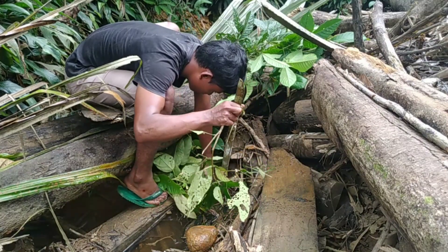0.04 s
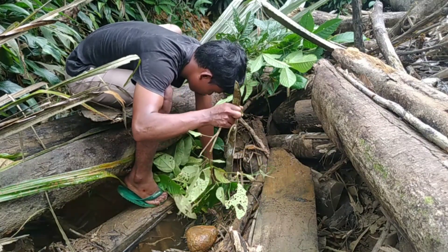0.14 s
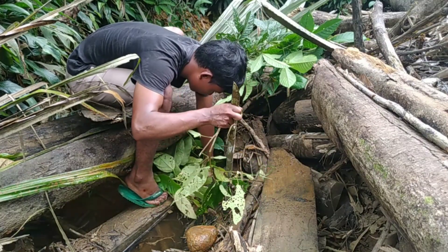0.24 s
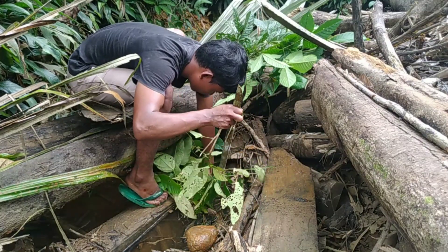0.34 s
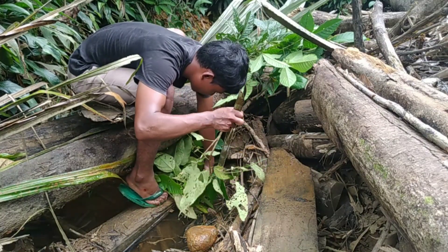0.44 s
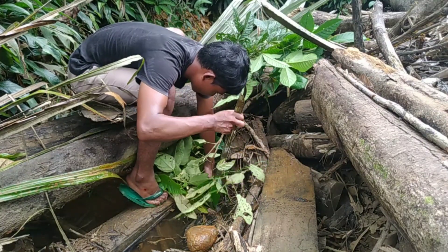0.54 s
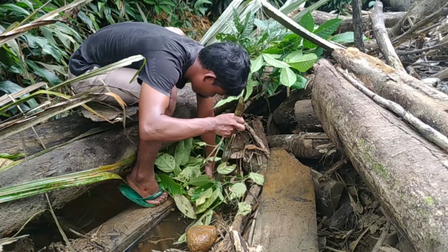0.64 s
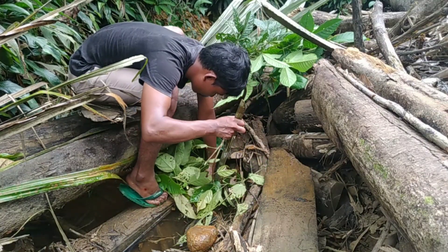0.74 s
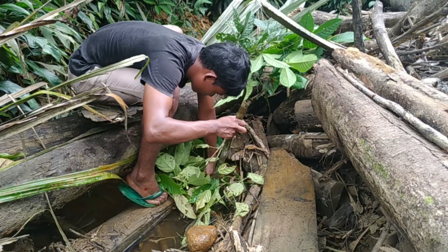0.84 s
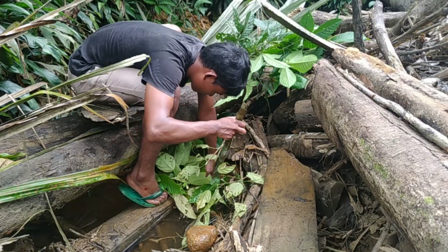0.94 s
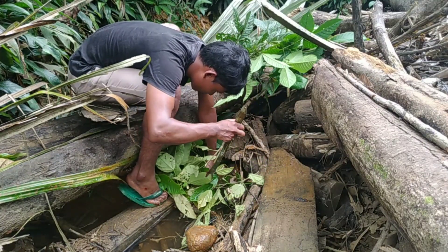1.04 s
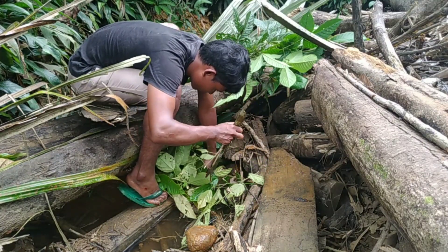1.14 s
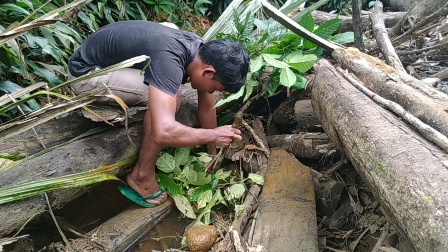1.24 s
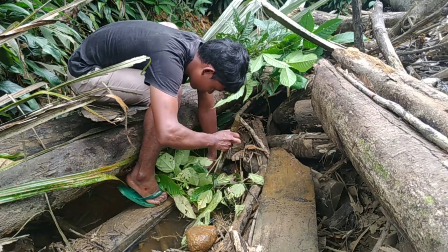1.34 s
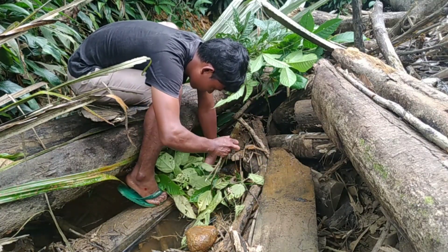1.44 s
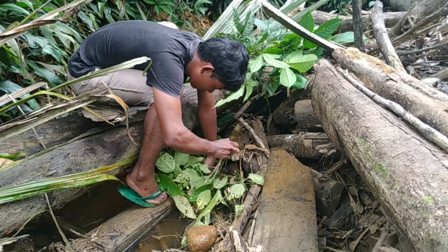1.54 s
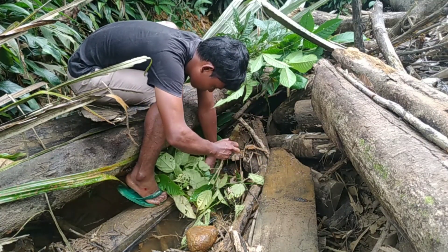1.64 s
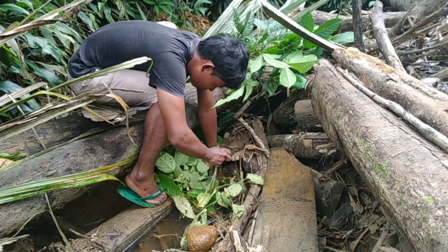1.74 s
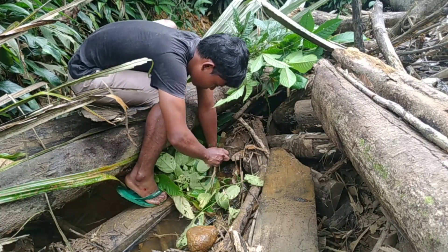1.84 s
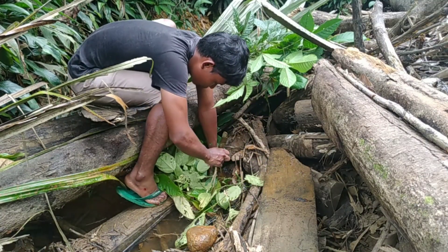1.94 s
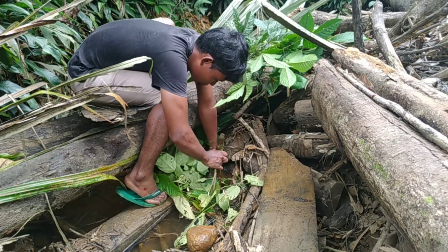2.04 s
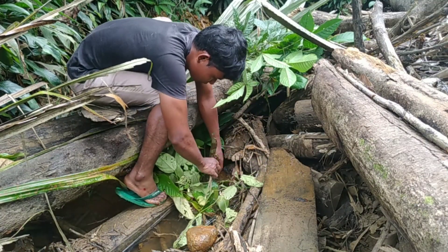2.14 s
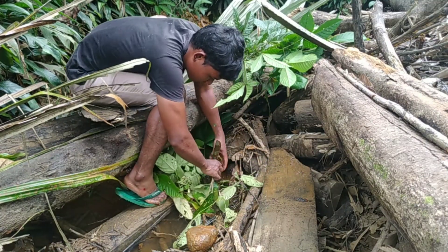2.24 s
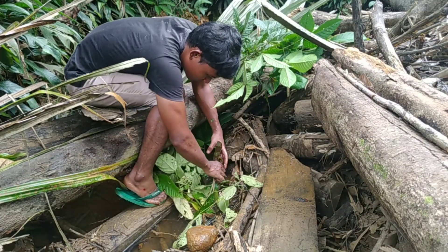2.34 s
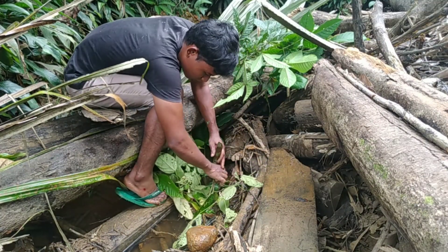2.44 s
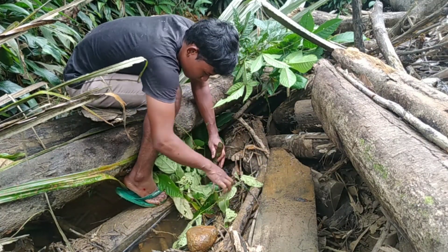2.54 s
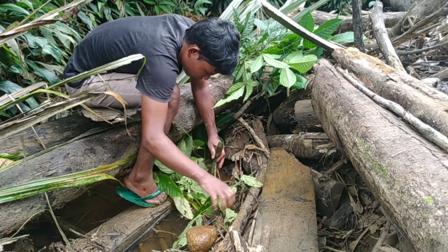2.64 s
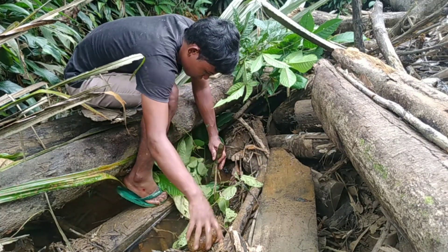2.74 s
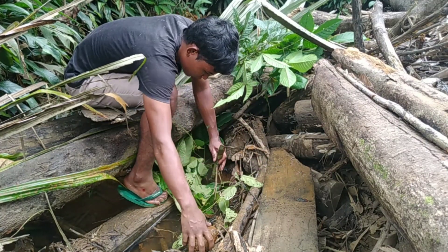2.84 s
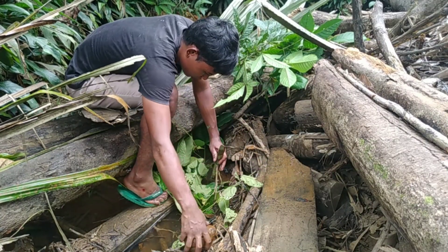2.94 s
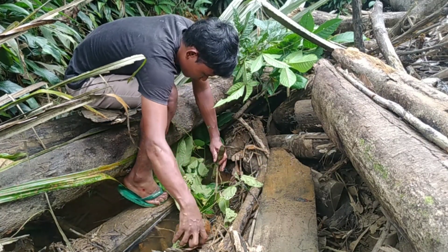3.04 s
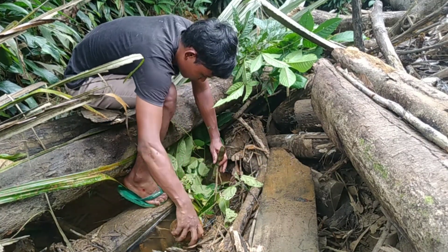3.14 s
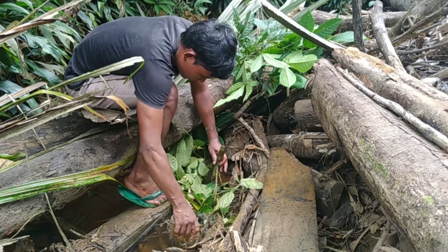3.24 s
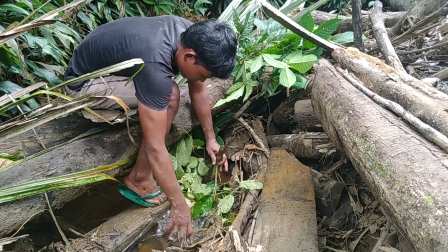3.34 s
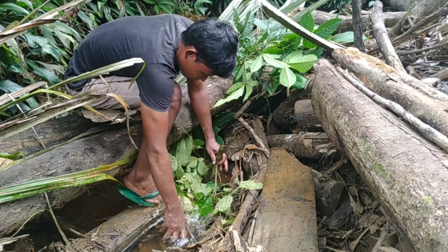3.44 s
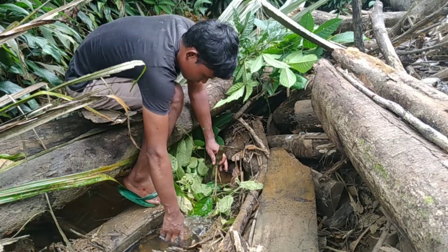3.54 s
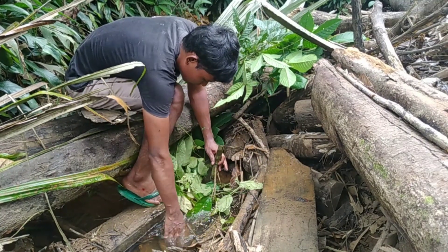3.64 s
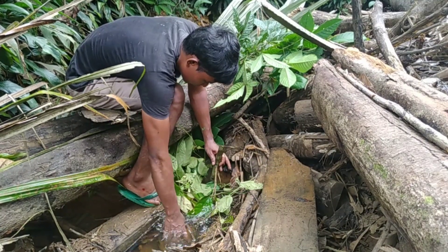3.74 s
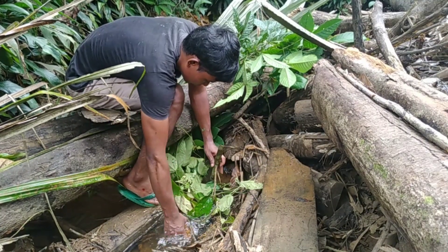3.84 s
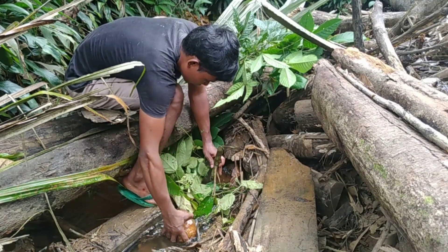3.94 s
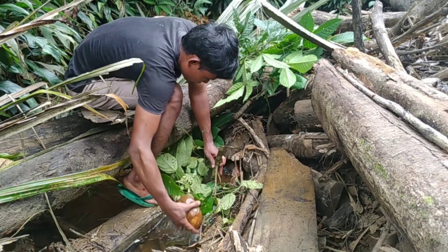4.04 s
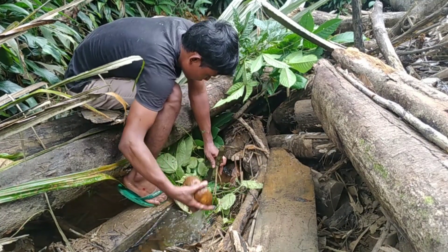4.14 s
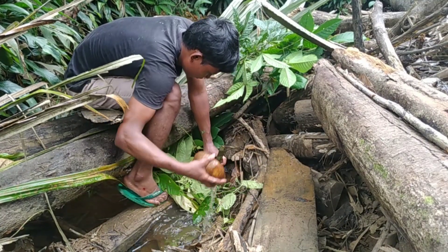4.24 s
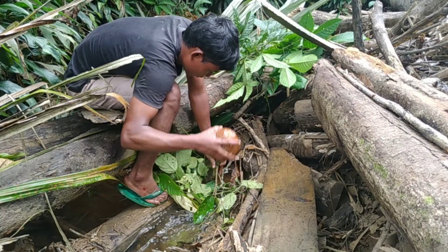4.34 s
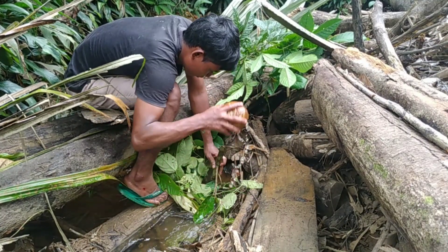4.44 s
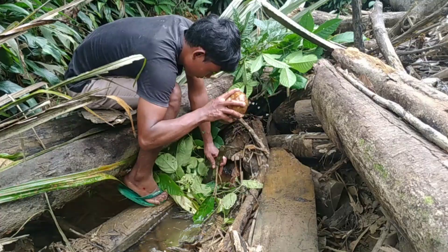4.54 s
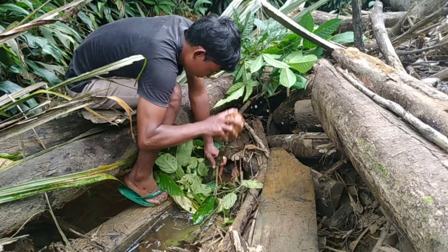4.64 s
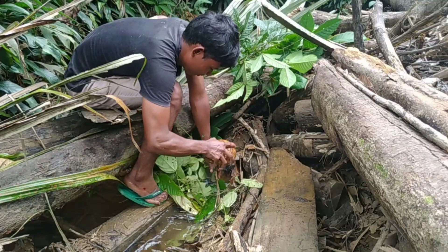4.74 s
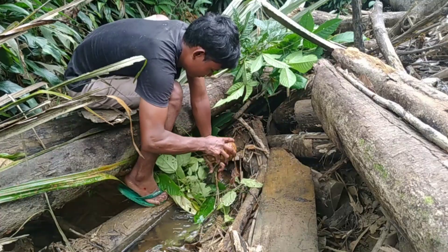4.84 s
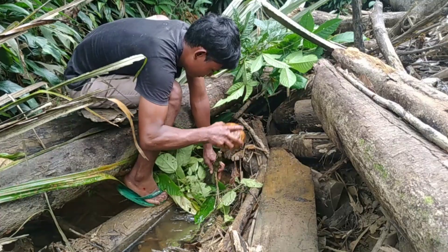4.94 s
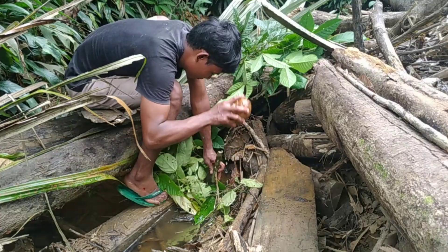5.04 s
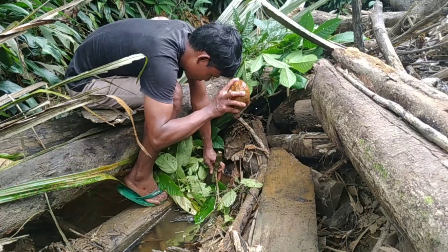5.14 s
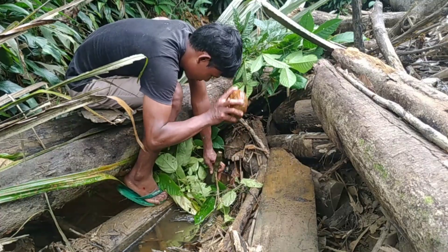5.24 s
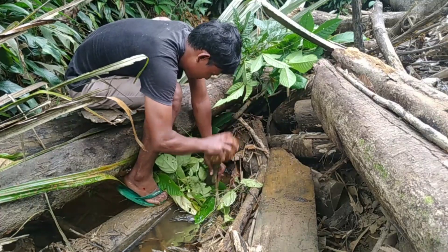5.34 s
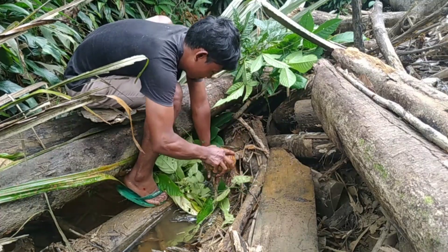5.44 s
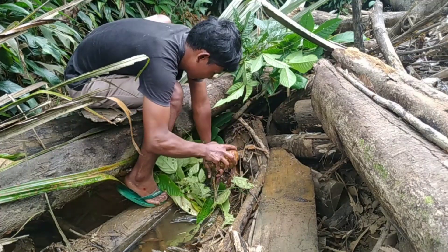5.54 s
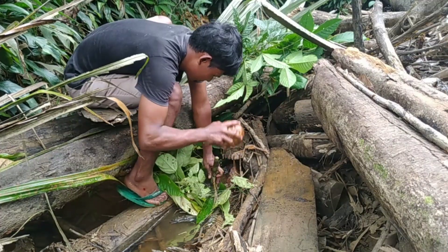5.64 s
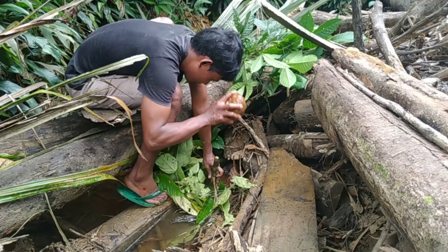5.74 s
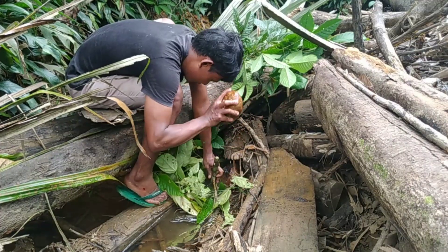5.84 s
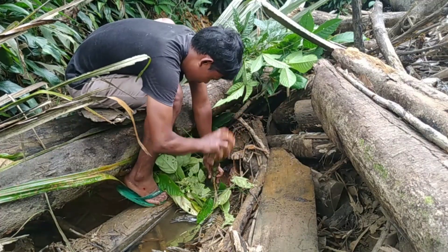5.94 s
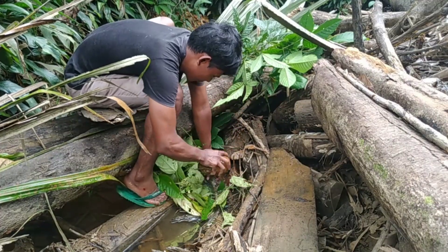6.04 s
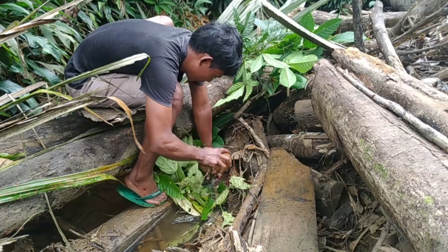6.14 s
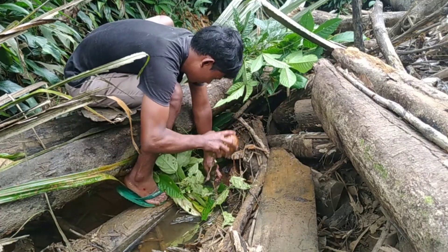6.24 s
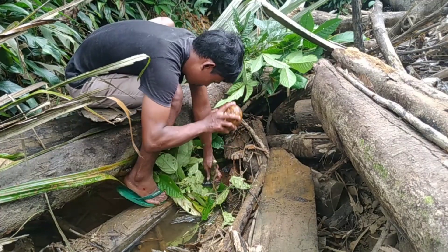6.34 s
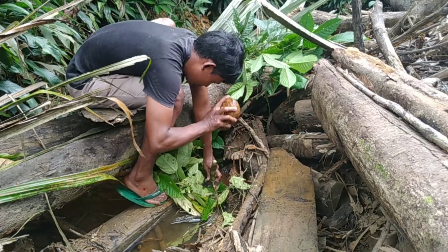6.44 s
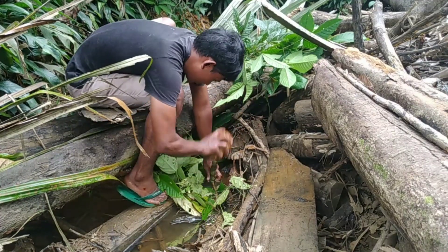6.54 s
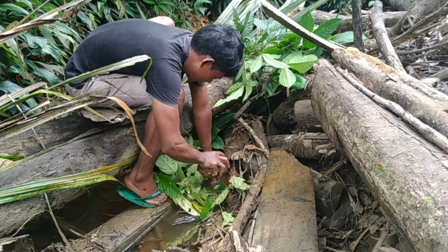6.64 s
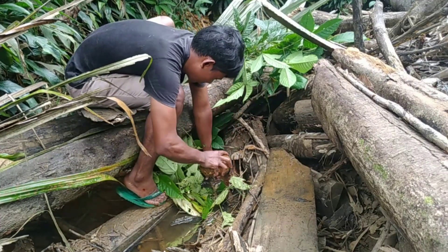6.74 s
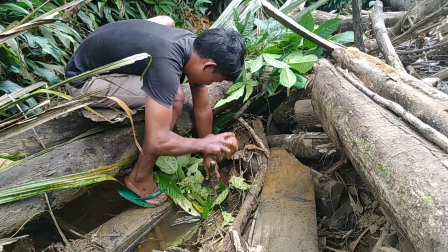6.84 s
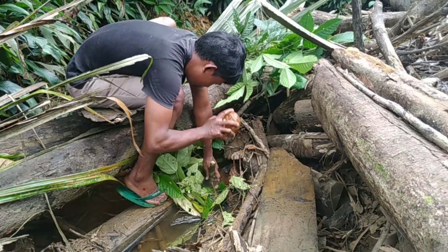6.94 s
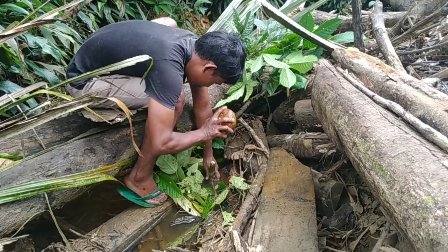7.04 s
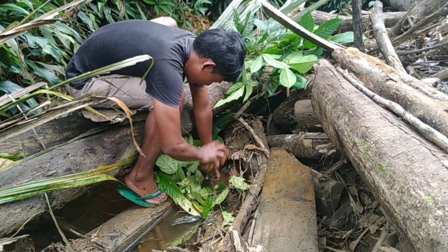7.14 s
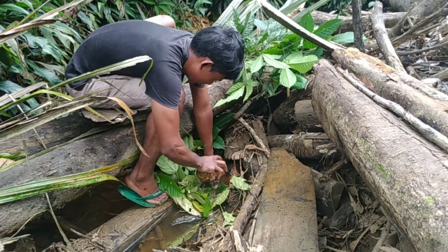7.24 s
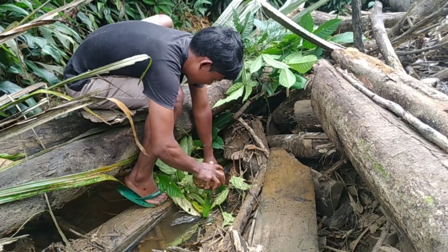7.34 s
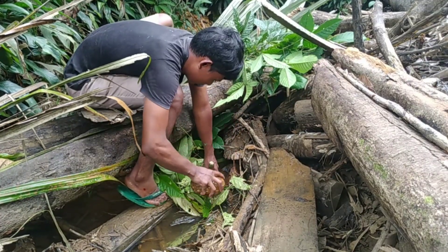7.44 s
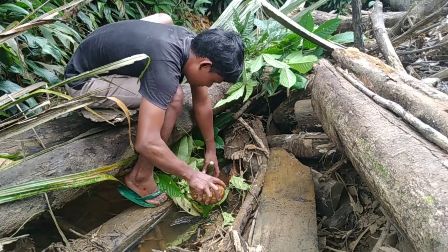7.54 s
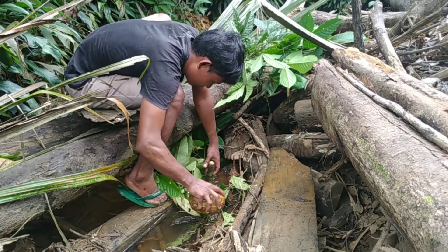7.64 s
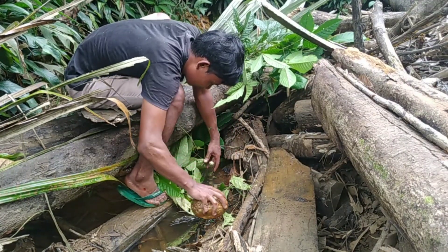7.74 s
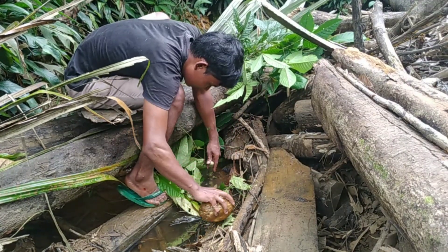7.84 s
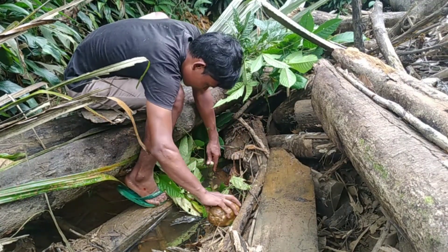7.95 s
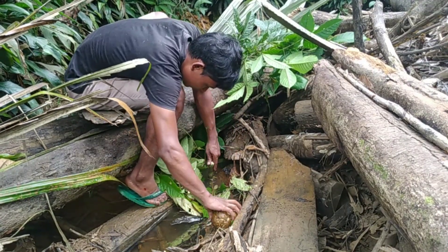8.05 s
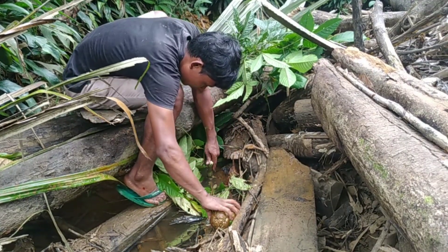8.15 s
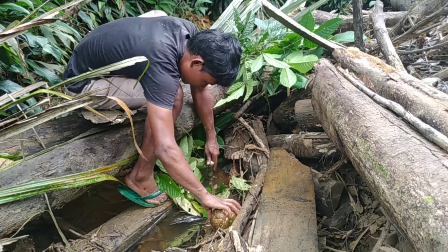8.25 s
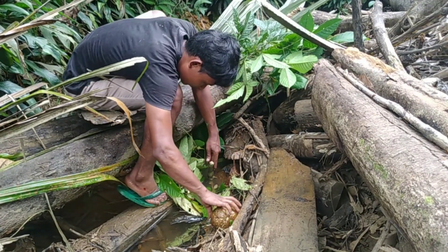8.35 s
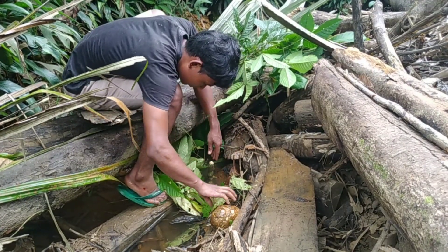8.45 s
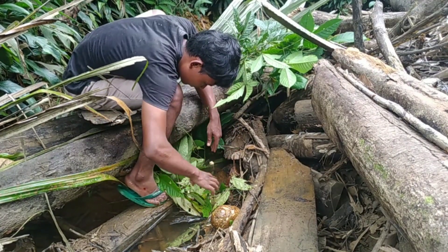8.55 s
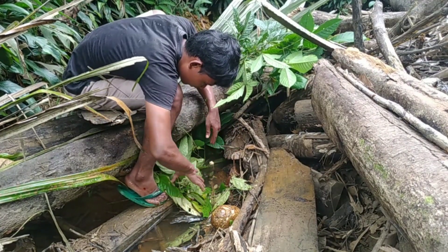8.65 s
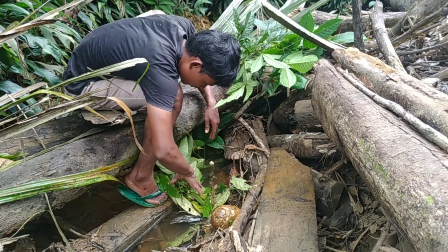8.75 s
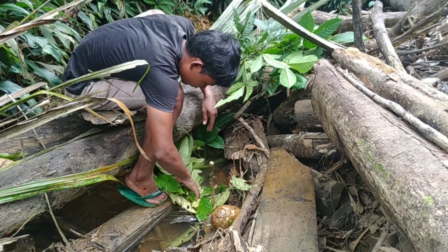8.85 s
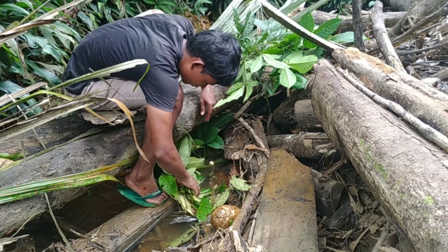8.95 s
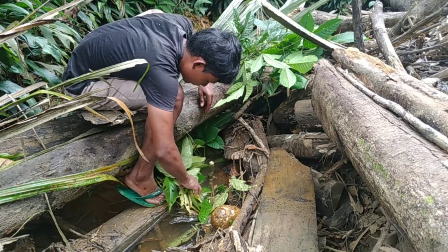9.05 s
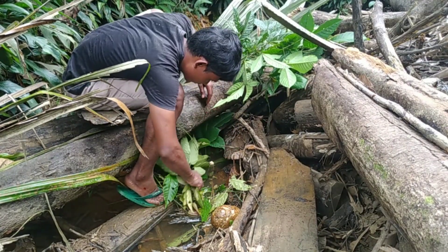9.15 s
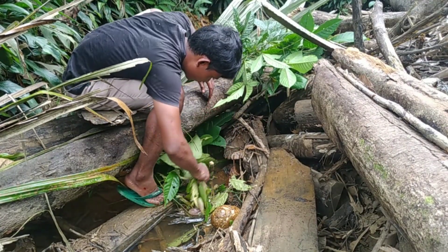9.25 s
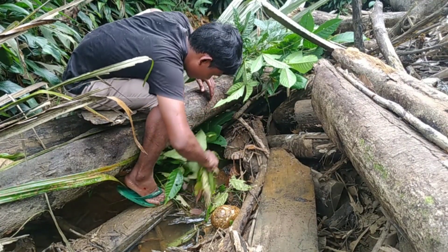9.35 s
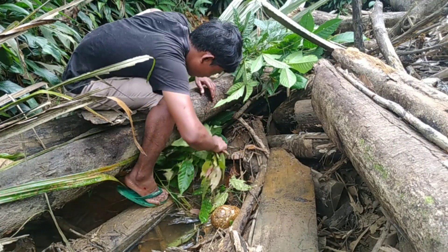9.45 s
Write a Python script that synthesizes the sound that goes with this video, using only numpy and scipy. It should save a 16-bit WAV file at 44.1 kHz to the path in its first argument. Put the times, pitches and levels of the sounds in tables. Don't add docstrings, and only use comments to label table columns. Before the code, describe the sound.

Leaves rustle and twigs snap, a husk splashes from shallow water, then five firm knocks drive a wooden stake amid hissing jungle cicadas.

```python
import sys
import numpy as np
from scipy import signal
from scipy.fft import rfft, irfft, next_fast_len
from scipy.io import wavfile
from scipy.ndimage import map_coordinates

SR = 44100
rng = np.random.default_rng(int(sys.argv[2]) if len(sys.argv) > 2 else 0)


def store_pcm(level_fs):
    pcm = np.round(np.clip(level_fs, -1, 1) * 32767).astype(np.int16)
    wavfile.write(sys.argv[1], SR, np.atleast_2d(pcm).T)


def volts_from_db(level):
    exponent = np.asarray(level, float) / 20
    return 10 ** exponent


N = 419391
PADDED = next_fast_len(N + SR // 4)
HZ = np.maximum(np.arange(PADDED // 2 + 1) * SR / PADDED, 1)
TIME = np.arange(N) / SR


def unit(x):
    return x / np.sqrt(np.mean(x ** 2) + 1e-20)


def in_time(rows):
    s, *columns = np.transpose(rows)
    return [np.interp(TIME, s, column) for column in columns]


def at_hz(points):
    hz, value = np.transpose(points)
    return np.interp(np.log(HZ), np.log(hz), value)


def filtered(x, gain):
    return irfft(rfft(x, PADDED) * gain, PADDED)[..., :N]


def colour(x, spectrum, ridges=1):
    inside = (HZ > spectrum[0][0]) & (HZ < spectrum[-1][0])
    return unit(filtered(x, volts_from_db(at_hz(spectrum)) * inside * ridges))


def drift(rate_hz):
    knots = rng.standard_normal(int(N / SR * 100) + 4)
    time = TIME[::16]
    return np.interp(TIME, time, map_coordinates(knots, [time * min(rate_hz, 99)], order=3))


def grains(per_s, spread_db):
    out, born = np.zeros(N), rng.random(N) < per_s / SR
    count = born.sum()
    size_db = spread_db * np.minimum(rng.exponential(1, count), 5)
    out[born] = volts_from_db(size_db) * rng.choice([-1, 1], count)
    return out


def add(out, s, sound):
    i = round(s * SR)
    out[i:i + len(sound)] += sound[:N - i]


# pitch_hz, likeness_share
FOREST_LIKENESS = [(40, 0.86), (130, 0.64), (500, 0.3), (1400, 0)]


def far_noise(spectrum, ridges=1):
    mid, side = rfft(rng.standard_normal((2, PADDED)))
    alike = np.clip(at_hz(FOREST_LIKENESS), -1, 1)
    pair = np.sqrt(1 + alike) * mid + np.sqrt(1 - alike) * side * np.array([[1], [-1]])
    return colour(irfft(pair, PADDED), spectrum, ridges)


# pitch_hz, level_db per Hz
AIR_SPECTRUM = [(59, -18), (100, -3), (176, -9), (1350, -20), (2870, -19.5), (3130, -15.5), (3470, -19.5),
                (4260, -18), (6000, -13), (7800, -35), (13200, -120)]


def forest_air():
    return volts_from_db(-53.5 + 2.5 + 0.5 * drift(3.94)) * far_noise(AIR_SPECTRUM)


# pitch_hz, level_db per Hz
BREEZE_SPECTRUM = [(12, -12), (27, -1), (60, -3.5), (110, -15.5), (220, -46)]
# start_s, level_db
GUST_LEVELS = [(0.0, -51), (0.69, -40.5), (1.32, -49), (2.27, -45), (2.81, -50), (4.74, -54), (5.24, -53.5),
               (6.44, -52), (6.73, -43), (7.07, -52), (7.47, -46.5), (8.92, -54), (9.4, -39), (9.51, -39)]


def breeze():
    return volts_from_db(in_time(GUST_LEVELS)[0] + 3 + 1.4 * drift(9.9)) * far_noise(BREEZE_SPECTRUM)


# pitch_hz, level_db per Hz
CHOIR_SPECTRUM = [(8000, -22.5), (8800, -2), (9700, 2.5), (10500, -1.5), (11300, -13), (12400, -6),
                  (13200, -16), (15250, -18.5), (15500, -45)]
# pitch_hz, level_db per Hz
LOW_CICADA_SPECTRUM = [(5000, -30), (5800, -14.5), (6400, -2.5), (7200, 1), (7900, -2.5), (8600, -11.5)]
# pitch_hz, level_db over the choir
LONE_SINGERS = [(6565, 3), (6794, 2), (7201, 5), (7250, 2), (7463, 6), (7644, 6), (7827, 5), (8035, 5),
                (8911, 5), (9125, 2), (9254, 5), (9415, 4), (9470, 4), (9631, 3), (9731, 4), (9895, 2),
                (10132, 6), (10260, 4)]
# pitch_hz, level_db
CHOIR_LEFT_TOP = [(9800, 0), (10800, -16), (11700, -20), (12300, -4), (13100, -16), (15000, -8)]
# start_s, end_s, level_db
LOW_CICADA_LULL = (1.0, 1.5, -3.5)


def cicadas():
    choir_db, low_db, singer_width_hz, tymbal_hz = -40.5, -45.5, 14, 181
    power = 1
    for hz, over_db in LONE_SINGERS:
        power = power + volts_from_db(2 * over_db) / (1 + (2 * (HZ - hz) / singer_width_hz) ** 4)
    ridges = np.sqrt(power)
    choir = far_noise(CHOIR_SPECTRUM, ridges) * volts_from_db(0.56 * drift(90))
    left = filtered(choir[0], volts_from_db(at_hz(CHOIR_LEFT_TOP)))
    choir = volts_from_db(choir_db + 3 + 0.54 * drift(5.7)) * np.array([left, choir[1]])
    tymbal = 1 + 0.078 * np.cos(2 * np.pi * np.cumsum(tymbal_hz + 1.6 * drift(2.2)) / SR)
    start, end, lull_db = LOW_CICADA_LULL
    falter_db = np.interp(TIME, [start - .2, start, end, end + 0.31], [0, lull_db, lull_db, 0])
    low_gain = volts_from_db(low_db + falter_db + 2.5 + 1.0 * drift(5))
    return choir + low_gain * far_noise(LOW_CICADA_SPECTRUM, ridges) * tymbal


# start_s, level_db
CRICKET_LEVELS = [(0, -56), (0.7, -65), (2.8, -65), (3.5, -63), (4.85, -58.5), (5.3, -66.5), (7.6, -60.5),
                  (8.8, -66), (9.51, -58)]


def cricket():
    hum = far_noise([(2930, -22), (3000, -14), (3050, 4), (3120, -1), (3200, 0), (3290, -14)])
    gain = volts_from_db(in_time(CRICKET_LEVELS)[0] + 2 + 3.0 * drift(6.0))
    return gain * hum * volts_from_db(np.array([[2.5], [-2.5]]))


# start_s, end_s, pitch_hz, level_db
FLY_HUM = (6.9, 9.1, 478, -65)


def fly():
    start, end, hz, level_db = FLY_HUM
    hover = np.interp(TIME, [start, start + 0.5, end - .2, end], [0, 1, 1, 0])
    gain = volts_from_db(level_db + 2.8 * drift(12)) * hover
    return gain * np.sin(2 * np.pi * np.cumsum(hz + 11.1 * drift(25)) / SR)


# start_s, length_s, pitch_hz, glide_hz_per_s, level_db
KATYDID_NOTES = [(0, 1.43, 12150, 52, -47), (1.37, 1.38, 12212, 112, -47), (0, 2.1, 12290, 81, -51),
                 (0, 2.7, 12770, -137, -52), (0.3, 1.6, 12885, -140, -55), (2.25, 1.05, 12150, 238, -55),
                 (2.1, .7, 12660, 93, -58), (3.5, 2, 12090, 192, -48), (3.5, .6, 12150, 60, -49),
                 (4.2, 1.85, 12062, 103, -51), (3.5, .9, 11715, 122, -54), (3.7, 1.75, 12508, 180, -60),
                 (3.8, .95, 12580, 347, -61), (5.5, .6, 12215, 75, -52), (5.4, .65, 11850, 108, -59),
                 (6.1, 1.2, 12190, 425, -61), (6.5, 1.75, 12122, 231, -49), (6.75, 1.4, 12133, 93, -50),
                 (6.6, 1, 11715, 135, -57), (6.95, .95, 12870, -158, -58), (8, 1.5, 12695, -150, -56),
                 (8.12, .98, 12090, 97, -51), (9, .5, 12170, 130, -48), (9.2, .3, 12070, 250, -49),
                 (0, 2.1, 12500, 72, -61), (0, 2.2, 11980, 90, -63), (7.3, .8, 12715, 170, -60),
                 (5.6, 1.2, 12900, -110, -63), (8.2, .7, 11810, 90, -61)]
STROKE_LEVELS = [-61, -63, -68, -62.5, -68, -62.5, -72, -60, -68, -64, -64, -70, -67.5, -68, -70, -68, -59,
                 -68, -66, -63, -63, -64, -59, -63, -72, -72, -72, -72, -72]


def katydids():
    left_db, arch_hz_per_s2 = -1.5, 33.0
    right, left, low = np.zeros((3, N))
    waver, wobble = drift(26), drift(29.76)
    for k, (start, length, hz, glide, level_db) in enumerate(KATYDID_NOTES):
        t = np.arange(round(length * SR)) / SR
        own = slice(k * 3000, k * 3000 + len(t))
        arch = arch_hz_per_s2 * t * (length - t) * (glide > 0 and start > 0)
        turns = 2 * np.pi * np.cumsum(hz + glide * t + arch + 8.0 * wobble[own]) / SR
        to_edge = np.minimum(t + (start == 0), length - t + (start + length > 9.4))
        fade = np.clip(to_edge / 0.05, 0, 1)
        add(right, start, volts_from_db(level_db + 5.0 + 4.0 * waver[own]) * fade * np.sin(turns))
        left_gain = volts_from_db(level_db + 5.0 + 4.0 * waver[::-1][own])
        add(left, start, left_gain * fade * np.sin(turns + 1.5 * wobble[::-1][own]))
        add(low, start, volts_from_db(STROKE_LEVELS[k] + 2.5 * waver[own]) * fade * np.sin(turns / 4))
    high = np.array([volts_from_db(left_db) * left, right])
    return 1.4 * (high + np.array([np.roll(low, 3), low]))


# pitch_hz, direct_share
DIRECT_SHARE = [(300, 0.95), (1000, 0.8), (2500, 0.56), (5000, 0.24), (9000, 0.081)]


def near(parts):
    left_lag_s = .0001
    straight, scattered = rfft(parts, PADDED)
    direct = np.clip(at_hz(DIRECT_SHARE), 0, 1)
    lag = np.exp(-2j * np.pi * HZ * left_lag_s)
    left = lag * (direct * straight + np.sqrt(1 - direct ** 2) * scattered)
    return irfft(np.array([left, straight]), PADDED)[:, :N]


def rubbing(per_s, spread_db, smooth, spectrum):
    parts = [unit(grains(per_s, spread_db)) + smooth * rng.standard_normal(N) for part in range(2)]
    return colour(np.array(parts), spectrum)


def bubbling():
    born, dealt = grains(700, 2.8) + 1e-18, rng.integers(0, 12, N)
    out, last = np.zeros(N), 5 * SR
    for k, hz in enumerate(np.geomspace(1300, 5200, 12)):
        r, w = volts_from_db(-60 * hz / (22.0 * SR)), 2 * np.pi * hz / SR
        pole = [1 - r, 0, 0, 1, -2 * r * np.cos(w), r * r]
        ringing = signal.sosfilt([pole, pole], (born * (dealt == k))[:last])
        out[:last] += ringing * np.sin(w) ** 2 * volts_from_db(-3.0 * np.log2(hz / 900))
    return unit(out)


# start_s, level_db
WORK_LEVELS = [(0, -61), (0.15, -55), (1.46, -58), (1.6, -53.5), (1.89, -47), (2.05, -57.5), (3.2, -59.5),
               (3.58, -45), (4.02, -59), (4.8, -62), (7.3, -72), (8.8, -67), (8.89, -40), (9.37, -44),
               (9.51, -37.5)]
# peak_s, body_db, crisp_db, t60_s
HAND_STROKES = [(0.715, -41.5, -46, 0.45), (2.2, -42, -51.5, 0.95), (2.64, -51, -53, 0.42),
                (2.94, -45.5, -47, 0.19), (3.03, -45.5, -41.5, 0.85), (3.266, -36.5, -39, 0.86),
                (3.3, -33, -40.5, 1.3), (3.388, -30, -46, 0.6), (3.444, -23.5, -30, 0.32),
                (4.14, -42, -45.5, 1.2), (5.425, -47.5, -60, .4), (5.552, -42, -58, 0.38),
                (7.59, -48, -66, 0.36), (8.12, -41.5, -53, 0.24), (0.41, -46.5, -54, .3),
                (1.519, -44.5, -52, 0.74), (9.42, -44, -43.5, 0.8), (8.93, -36.5, -49, 0.58),
                (9.049, -41, -51, .4), (9.16, -39, -46, .5), (9.22, -37.5, -46, .3), (9.46, -38.5, -45, .5),
                (4.17, -39.5, -46, .4), (1.84, -42, -49, .5)]


def effort():
    swell_db_per_s, work_crisp_db = 450, -8
    settle_after_s, settle_t60_s, settle_shortens = 0.045, 0.75, 0.77
    time = TIME[::32]
    levels = in_time(WORK_LEVELS)[0][::32] + np.array([[0], [work_crisp_db]])
    for s, body_db, crisp_db, t60 in HAND_STROKES:
        shape_db = np.minimum(swell_db_per_s * (time - s), -60 * (time - s) / t60)
        levels = np.maximum(levels, shape_db + np.array([[body_db], [crisp_db]]))
    for k, (s, *_) in enumerate(HUSK_BLOWS):
        late = np.maximum(time - s - settle_after_s, 0)
        t60 = settle_t60_s * settle_shortens ** k
        shape_db = np.where(time > s, -60 * late / t60, -np.inf)
        levels = np.maximum(levels, shape_db + np.array([[-40], [-48]]))
    return [np.interp(TIME, time, volts_from_db(level)) for level in levels]


# pitch_hz, level_db per Hz
RUSTLE_BODY = [(150, -8.5), (300, -3), (700, -4.5), (1500, -3.5), (2500, -1.5), (4000, -5), (6500, -13.5)]
# pitch_hz, level_db per Hz
RUSTLE_CRISP = [(2500, -1), (5000, -1.5), (8000, 0), (10800, 12), (13000, 2.5), (15300, -3), (16000, -30)]
# start_s, wet_share
WETNESS = [(3.25, .2), (3.3, 0.4), (3.4, 0.4), (3.45, 0.5), (3.56, 0.45), (4.7, 0.95), (4.8, 0.01)]


def hands():
    body_gain, crisp_gain = effort()
    wet = np.clip(in_time(WETNESS)[0], 0, 1)
    clumps = volts_from_db(4.5 * drift(28))
    dry_body = np.sqrt(1 - wet) * rubbing(3500 * clumps, 3.26, 0.58, RUSTLE_BODY)
    wet_body = volts_from_db(-2.0) * np.sqrt(wet) * bubbling() * [[1], [0]]
    body = body_gain * volts_from_db(2.0 * drift(45)) * (dry_body + wet_body)
    return body + crisp_gain * volts_from_db(12.0) * rubbing(4000 * clumps, 2.4, 0.26, RUSTLE_CRISP)


# start_s, level_db, pitch_hz
BUBBLE_NOTES = [(3.262, -34, 1130), (3.288, -20, 2290), (3.385, -20, 1930), (3.446, -15, 736),
                (3.464, -12.5, 2280), (3.48, -12, 2510), (3.487, -11.5, 2500), (3.549, -29, 677),
                (3.615, -36, 825), (3.64, -25, 1860), (3.691, -32.5, 1110), (3.737, -38, 1410),
                (4.098, -40.5, 874), (4.19, -26, 1190), (3.986, -25.5, 1760), (4.127, -26, 2210),
                (4.151, -27, 1260), (4.163, -22, 1440), (4.192, -21.5, 1710), (4.209, -24, 1340),
                (4.285, -30.5, 1580), (4.297, -31, 1760), (4.376, -31, 1900), (4.384, -34, 1050),
                (5.067, -35, 1600), (5.531, -37, 1650), (5.551, -37, 1310), (5.573, -28, 1660),
                (5.669, -43, 1300), (5.606, -35, 1640), (3.3, -24, 2500), (3.304, -33, 1250),
                (3.318, -23, 2600), (3.333, -27, 2300), (3.372, -31, 950), (3.404, -25, 1150),
                (3.45, -19, 1100), (3.458, -24, 1600), (3.477, -24, 1500), (3.438, -18, 1000),
                (3.479, -22, 4280), (3.497, -24, 2400), (4.17, -30, 2610), (4.176, -30, 1900),
                (4.2, -31, 2200), (3.705, -35, 1850), (3.75, -39.5, 1250), (3.802, -39, 1400),
                (3.858, -41, 1250), (4.087, -37, 1600), (4.113, -36, 972), (4.262, -38, 1300),
                (4.288, -34, 1100), (4.337, -43, 1150), (4.362, -39, 1100), (4.853, -24, 1700),
                (4.879, -32, 1750), (4.886, -32, 1500), (4.896, -28, 1900), (5.465, -27, 1710),
                (5.561, -31, 1500)]
# start_s, level_db, pitch_hz
STICK_KNOCKS = [(0.408, -43, 420), (0.706, -32, 1620), (0.735, -29, 1960), (1.82, -37, 778),
                (2.192, -43, 777), (2.228, -35.5, 490), (2.636, -35, 930), (6.177, -21, 1600),
                (6.181, -30, 600), (6.178, -27, 2500), (6.179, -31, 3600), (6.178, -30, 2900),
                (6.18, -29, 2150), (6.183, -27, 1260), (6.188, -33, 950), (8.883, -30, 2850),
                (8.865, -39, 1320), (8.92, -31, 2100), (8.932, -30, 2700), (8.947, -30, 2400),
                (9.22, -30, 1290), (9.258, -36, 900), (9.05, -34, 1000), (9.409, -29, 2980),
                (8.11, -29, 608), (8.9, -17, 2200), (8.901, -17, 2550), (8.901, -28, 1200)]
# start_s, level_db, pitch_hz, length_cycles, rise_share
AIR_GULPS = [(3.417, -17.5, 381, 22, 1.28), (3.263, -28.5, 197, 6.6, .1), (3, -40, 167, 5.3, .1),
             (3.386, -21, 165, 6.7, 0.066), (3.412, -25, 210, 4, .1), (3.432, -11.5, 597, 14.5, 0.61),
             (3.47, -29, 514, 32, 0.11), (3.51, -24, 1120, 19, 0.073), (3.52, -30, 850, 50.0, -0.1),
             (3.455, -24, 520, 14.0, .1), (3.638, -27, 1250, 30.0, .5), (3.44, -17, 800, 22.0, .5),
             (3.462, -20, 1700, 30.0, .3), (4.28, -32, 1100, 20.0, .6), (4.185, -28, 1250, 18.0, .5),
             (3.575, -37, 1900, 45.0, .25), (3.636, -32, 1250, 30.0, .6), (3.274, -33, 230, 5.0, .1),
             (3.352, -32, 220, 5.0, .1), (6.18, -26, 520, 6.0, 0.12), (8.115, -23, 205, 3.9, 0.12),
             (8.12, -35, 435, 17, .1)]


def drips_and_knocks():
    log_echo_s = 0.002304
    out = np.zeros(N)
    rows = [(*row, 27.4, 0.12) for row in BUBBLE_NOTES]
    rows += [(*row, 13.6, 0.069) for row in STICK_KNOCKS]
    rows += AIR_GULPS
    splats = rng.standard_normal((len(rows), 900))
    splat_fade_db = -np.arange(900) / SR * 60 / .025
    for (s, peak_db, hz, cycles, rise), splat in zip(rows, splats):
        t60 = np.clip(cycles, 2, 60) / hz
        t = np.arange(round(t60 * SR)) / SR
        phase = 2 * np.pi * hz * (t + rise * t ** 2 / t60)
        swell = 1 - np.exp(-t * hz / 0.93)
        add(out, s, volts_from_db(peak_db + 1.5 - 46.6 * (t / t60) ** 1.01) * swell * np.sin(phase))
        band = signal.butter(1, [.8 * hz, 1.8 * hz], "band", fs=SR)
        add(out, s, volts_from_db(peak_db - 8.5 + splat_fade_db) * unit(signal.lfilter(*band, splat)))
    return np.array([out, np.roll(out, round(log_echo_s * SR))])


def bursts(rows):
    burst_s = 0.0053
    shape = np.zeros(N)
    after = np.maximum(np.arange(SR // 10) / SR - burst_s, 0)
    for s, peak_db in rows:
        add(shape, s, volts_from_db(peak_db - 10.0) * (volts_from_db(-60 * after / 0.0083) + volts_from_db(-13.5 - 60 * after / 0.36)))
    return shape


# start_s, level_db
TWIG_SNAPS = [(1.8213, -19), (3.0165, -18.5), (3.265, -22), (3.3845, -3), (3.438, -13), (3.6882, -16),
              (4.4386, -23), (4.449, -23), (4.484, -22), (5.5119, -22), (6.752, -23), (8.122, -24),
              (9.409, -21)]
# pitch_hz, level_db per Hz
SNAP_SPECTRUM = [(1200, -24), (4000, -22.5), (7500, -14.5), (9800, -5), (11300, 7.5), (12500, -9.5),
                 (15300, -15)]
# start_s, level_db
LANDING_PATS = [(0.406, -29), (1.232, -35), (3.6882, -28), (3.9876, -18), (4.149, -25), (4.163, -15.5),
                (4.2724, -22), (4.3797, -26), (8.9004, -33)]
# low_hz, high_hz
PAT_BAND = [2600, 13400]


def snaps_and_pats():
    noise = rng.standard_normal((2, N))
    dull = unit(signal.lfilter(*signal.butter(1, PAT_BAND, "band", fs=SR), noise))
    return bursts(TWIG_SNAPS) * colour(noise, SNAP_SPECTRUM) + bursts(LANDING_PATS) * dull


# start_s, level_db, crunch_db, crack_db, bounce_s
HUSK_BLOWS = [
    (4.818, -21.5, -24, -36, .009),
    (5.449, -12, -21.5, -25, 0.0063),
    (6.0694, -5.5, -22, -8.5, 0.00362),
    (6.683, -6, -22.5, -35, 0.00205),
    (7.271, -6, -23.5, -17.5, .0086),
]
# pitch_hz, level_db, t60_s
STAKE_MODES = [
    [(205, -2.5, 0.73), (392, 3, 0.076), (570, -10, 0.035), (1010, -23, 0.074), (1276, -28, 5.0),
     (1771, -26, 5.0), (2300, -8, .04), (2870, -12, .04)],
    [(282, -5, .03), (400, 1.5, 0.015), (860, -16, 0.51), (1152, -52, 5.0), (1390, -22, 0.18),
     (1523, -27, 0.27), (1660, -15, 0.15)],
    [(1030, -11, 0.025), (594, -5.5, 0.05), (470, 3, 0.017), (894, -9, 0.03), (1427, -13, 0.04),
     (2416, -13, .06), (2900, -9, .05), (3400, -14, .04)],
    [(326, -36, 0.037), (460, 5, 0.019), (720, -8, 0.1), (990, -7.5, 0.025), (1200, 1.5, 0.021),
     (1354, -24, 0.048), (2230, -24, .03)],
    [(590, -2, 0.03), (486, -6, .03), (212, -10, .04), (2230, -14, .04), (960, -10, 0.03), (741, -10, .03),
     (1140, -28, 0.11), (1300, -8, 0.024), (1600, -20, 0.04), (1900, -14, .02), (3210, -5, 0.028),
     (406, -6.5, .02)],
]
# pitch_hz, level_db, t60_s
HUSK_MODES = [(371, -15, 0.06), (420, -10, 0.029)]
# start_s, level_db under the blow
HUSK_RETOUCHES = [
    [(4.8325, -7), (4.852, -9)],
    [(5.4735, -7), (5.464, -10)],
    [(6.0805, -20)],
    [(6.6957, -15)],
    [(7.2938, -19)],
]
# pitch_hz, level_db per Hz
CRUNCH_SPECTRUM = [(180, -28), (300, -2), (624, -7), (1280, -15.5), (2070, -8), (6960, -16.5),
                   (8500, -14.5), (10900, -2), (15000, -23), (16000, -7)]


def blows():
    rise_s, push_s, push_db = 0.001597, 0.00019, -9.5
    out, crunch = np.zeros(N), np.zeros(N)
    t = np.arange(SR // 3) / SR
    ring = t[:SR // 10]
    swell = 1 - np.exp(-t / 0.0026)
    ground = np.sin(2 * np.pi * 96 * t)
    bank = np.sin(2 * np.pi * 135 * t) + 0.35 * np.sin(2 * np.pi * 185 * t)
    crack = np.sin(2 * np.pi * 2450 * t)
    for (s, peak_db, crunch_db, crack_db, bounce), modes, again in zip(HUSK_BLOWS, STAKE_MODES, HUSK_RETOUCHES):
        ground_db, bank_db = -26.5 + 0.4 * peak_db, -24.5 + .2 * peak_db
        grind_s = 0.01 - .0013 * peak_db
        s += rise_s
        add(out, s - 4 * push_s, volts_from_db(peak_db + push_db) * np.exp(-(t[:200] / push_s - 3) ** 2))
        contacts = [(0, 0), (bounce, -3.5)] + [(when - s, db) for when, db in again]
        for late, loss_db in contacts:
            for hz, mode_db, t60 in list(modes) + HUSK_MODES:
                fade_db = -60 * ring / np.clip(t60, .015, .1)
                gain = volts_from_db(peak_db - 7.0 + loss_db + mode_db + fade_db)
                add(out, s + late, -gain * np.sin(2 * np.pi * hz * ring))
        add(out, s, volts_from_db(crack_db + 4.5 - 60 * t / 0.0088) * crack)
        add(out, s, volts_from_db(ground_db + 14.0 - 60 * t / 0.096) * ground * swell)
        add(out, s, volts_from_db(bank_db + 3.5 - 60 * t / 0.11) * bank * swell)
        after = np.maximum(t - grind_s, 0)
        tail = volts_from_db(-60 * after / 0.074) + volts_from_db(-13.0 - 60 * after / .5)
        add(crunch, s, volts_from_db(crunch_db - 220 * t) * tail)
    litter = volts_from_db(2.5) * crunch * volts_from_db(3.3 * drift(95)) * rubbing(7000, 0.82, 1.33, CRUNCH_SPECTRUM)
    return out * np.array([[1], [0]]) + litter


def scene():
    forest = forest_air() + breeze() + cicadas() + cricket() + fly() + katydids()
    return forest + near(hands() + drips_and_knocks() + snaps_and_pats() + blows())


def roll_off(x):
    return signal.sosfilt(signal.butter(12, 15900, fs=SR, output="sos"), x)


# pitch_hz, left_minus_right_db
PORT_BALANCE = [(60, -0.2), (1500, -.5), (4400, 0), (6500, -6), (8500, -9.5), (11000, -22.5), (15000, -8.5)]


def record(dry):
    top_hz = 15450
    ratio = volts_from_db(at_hz(PORT_BALANCE))
    ports = np.array([ratio, np.ones_like(ratio)]) * np.sqrt(2 / (1 + ratio ** 2))
    mix = filtered(dry, ports / (1 + (HZ / top_hz) ** 80))
    return roll_off(np.clip(mix, -.97, .97))


dry = scene()
out = record(dry)
store_pcm(out)
```